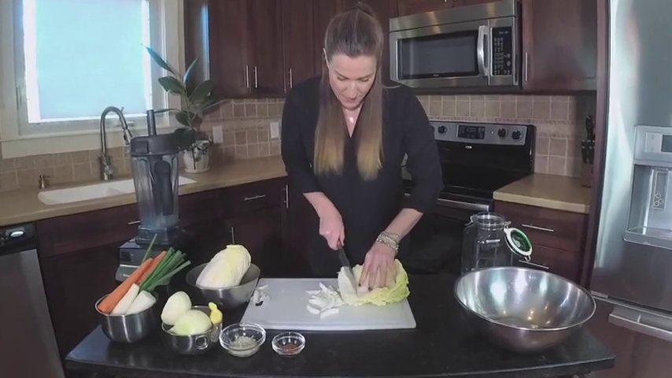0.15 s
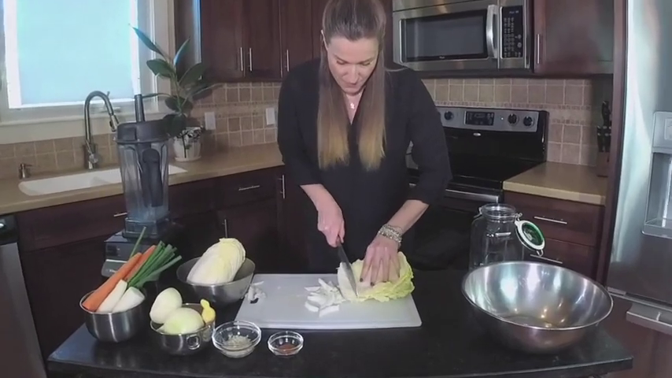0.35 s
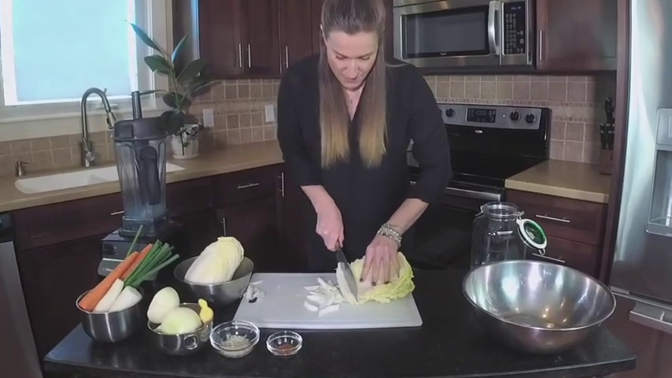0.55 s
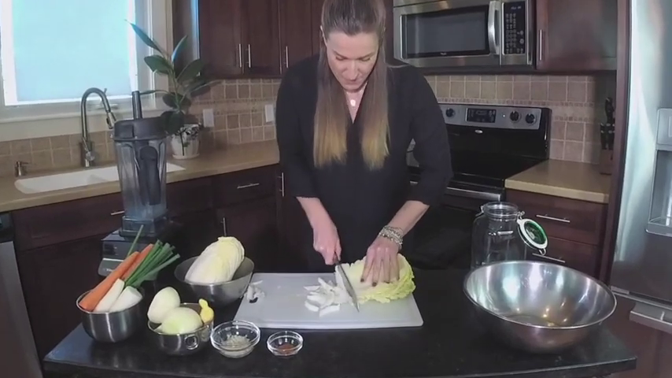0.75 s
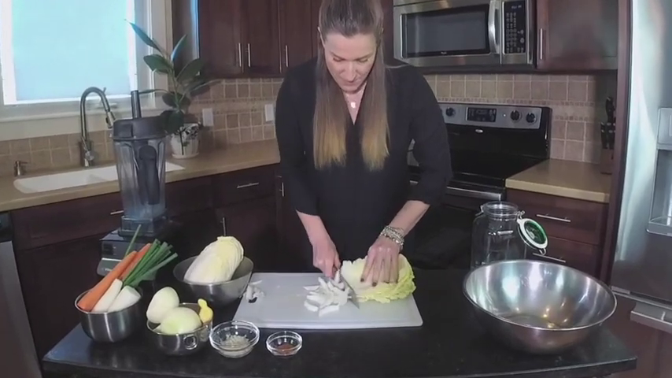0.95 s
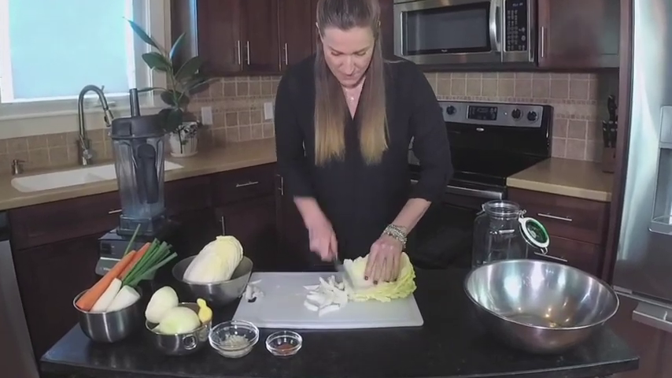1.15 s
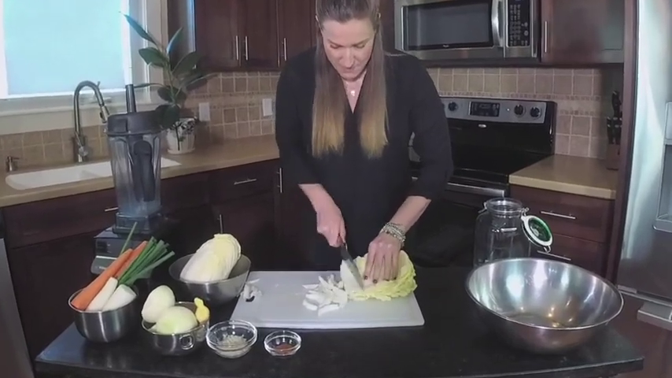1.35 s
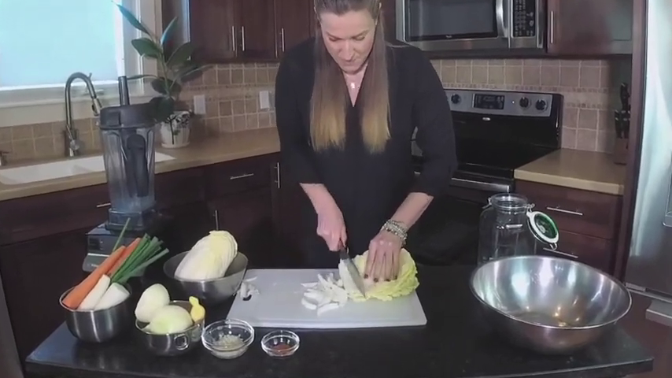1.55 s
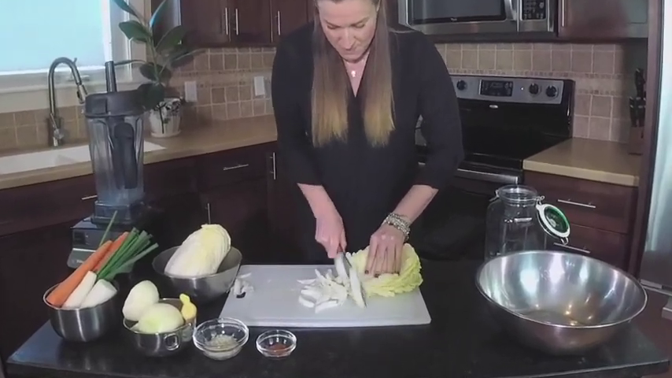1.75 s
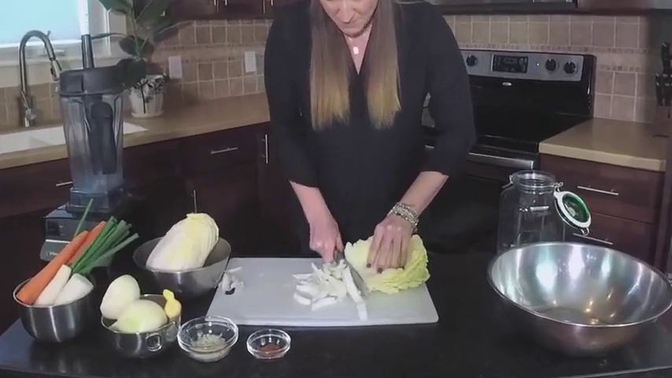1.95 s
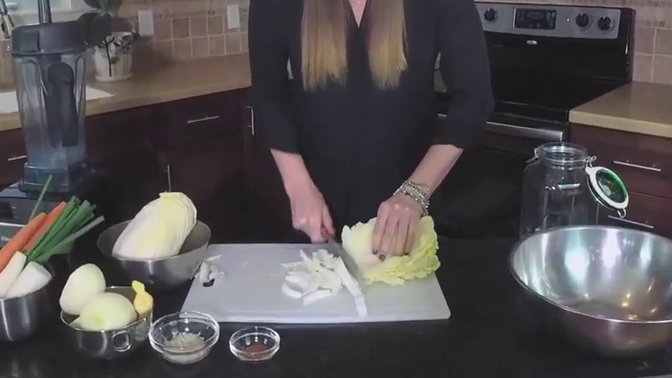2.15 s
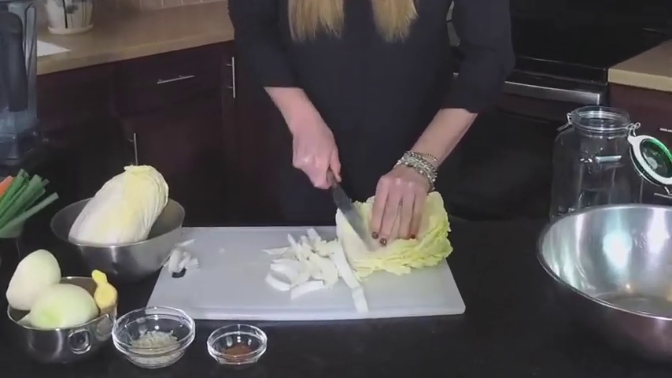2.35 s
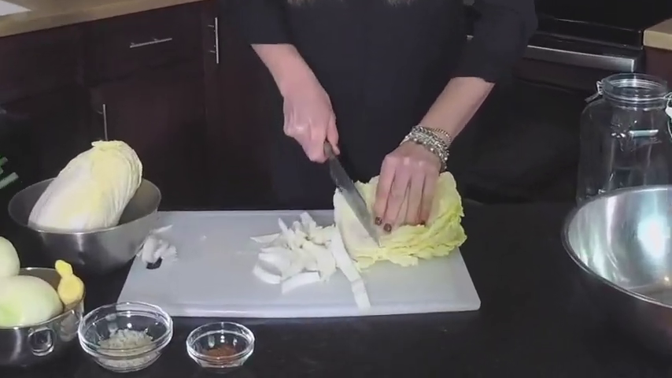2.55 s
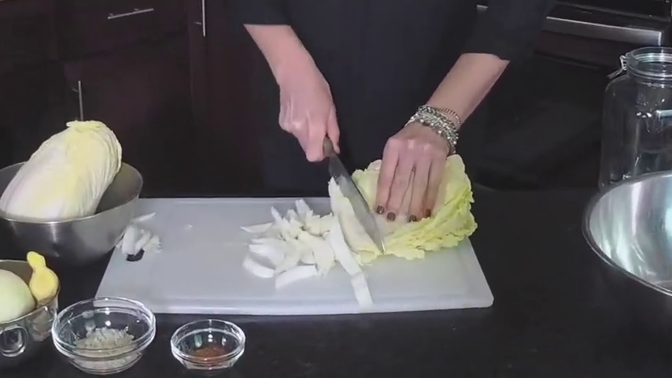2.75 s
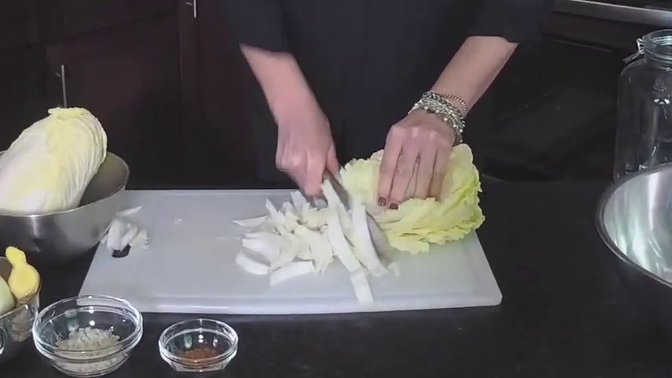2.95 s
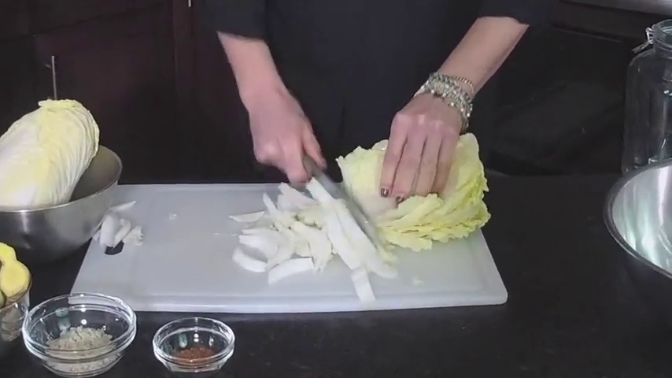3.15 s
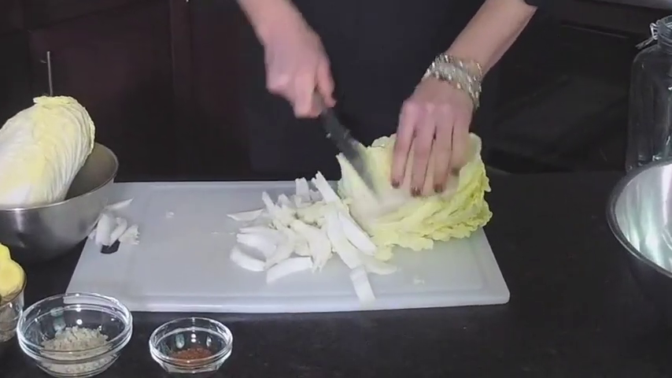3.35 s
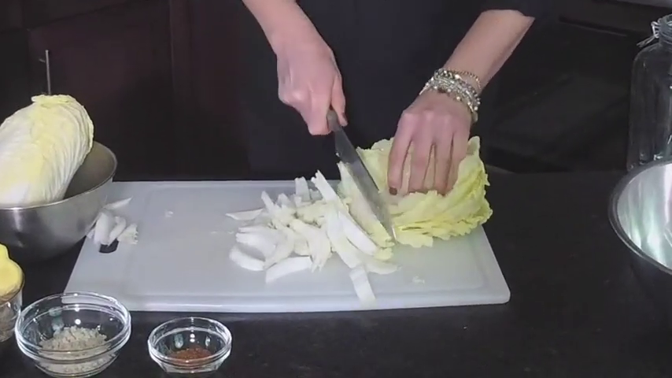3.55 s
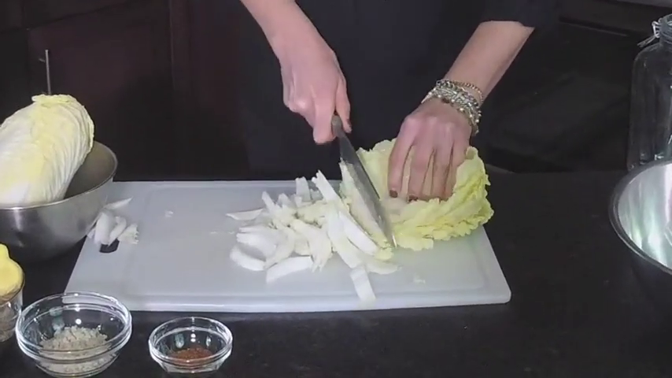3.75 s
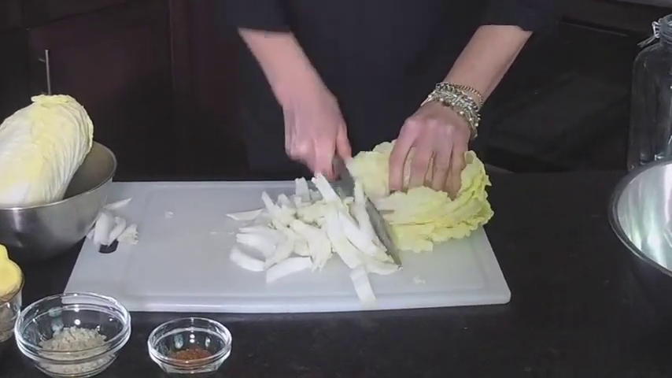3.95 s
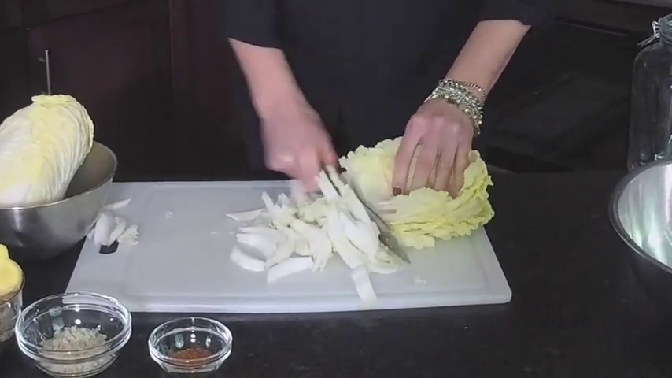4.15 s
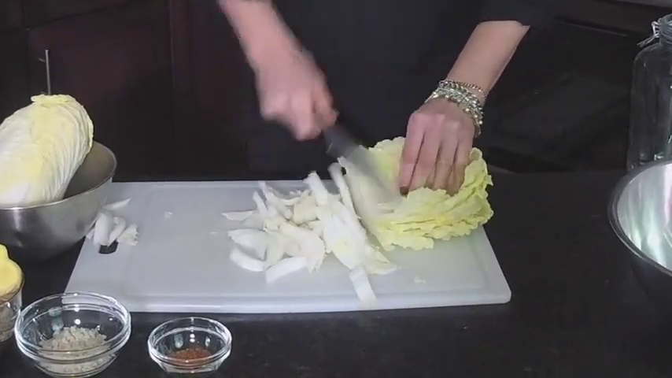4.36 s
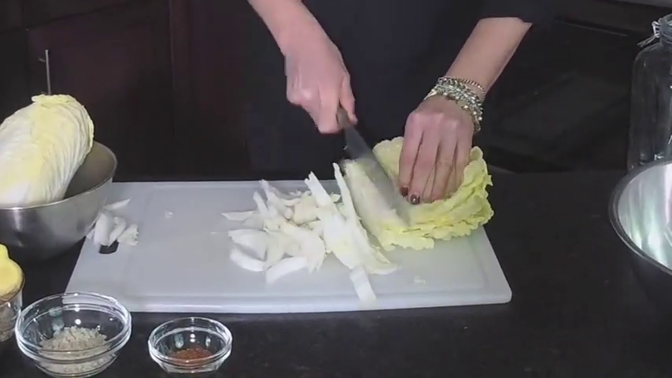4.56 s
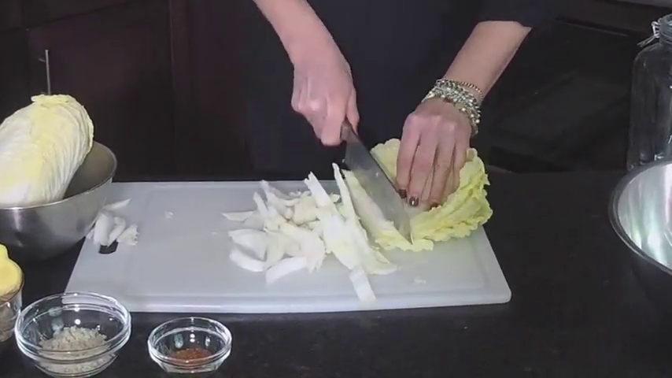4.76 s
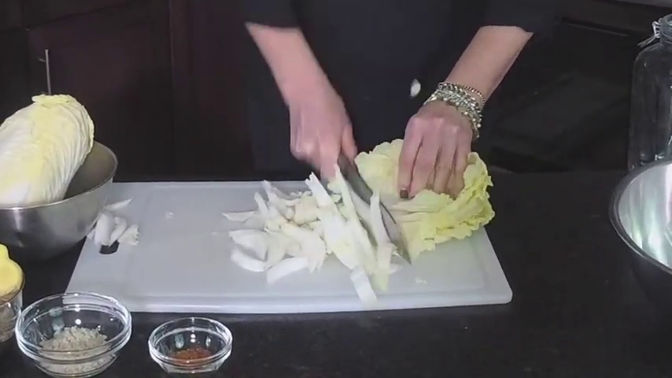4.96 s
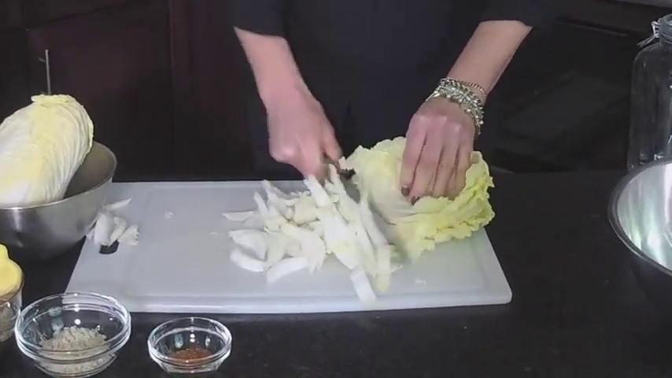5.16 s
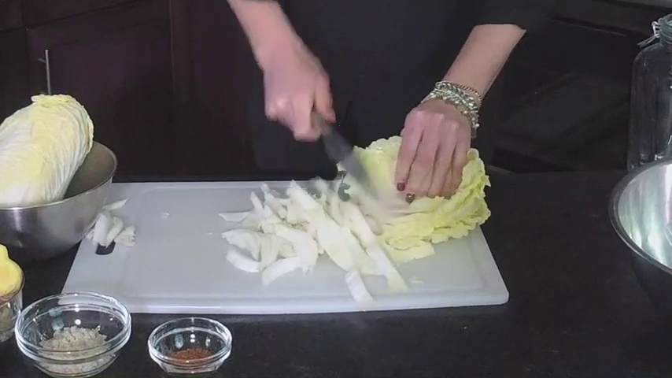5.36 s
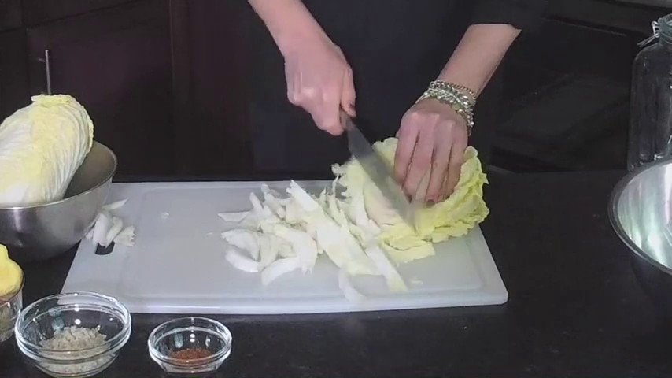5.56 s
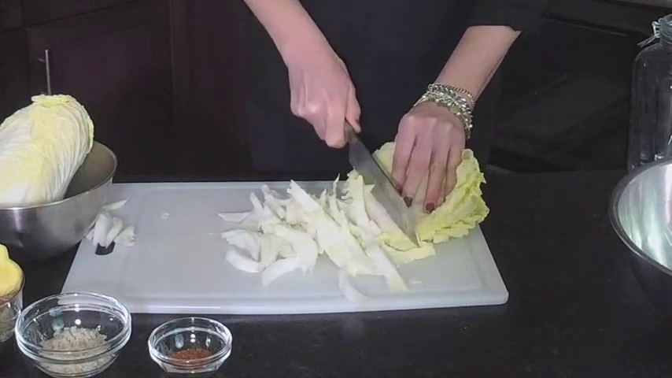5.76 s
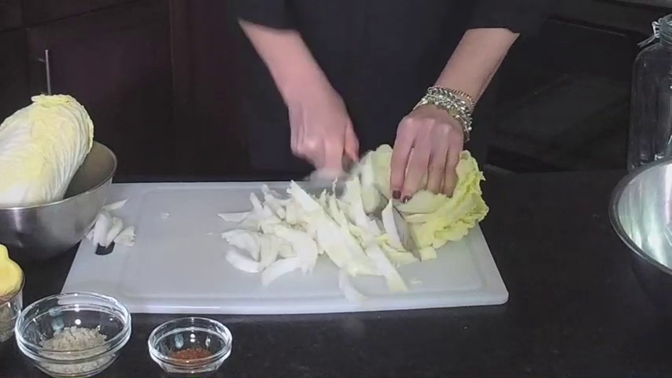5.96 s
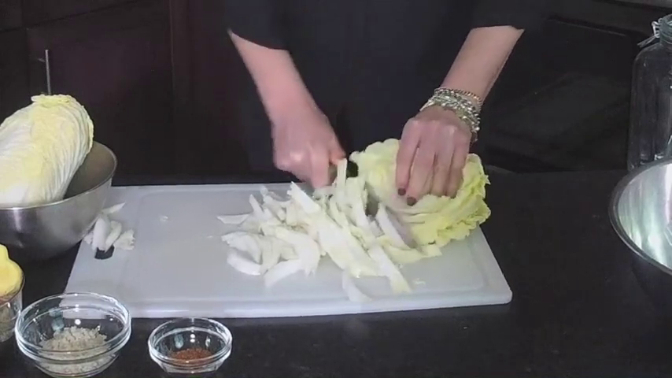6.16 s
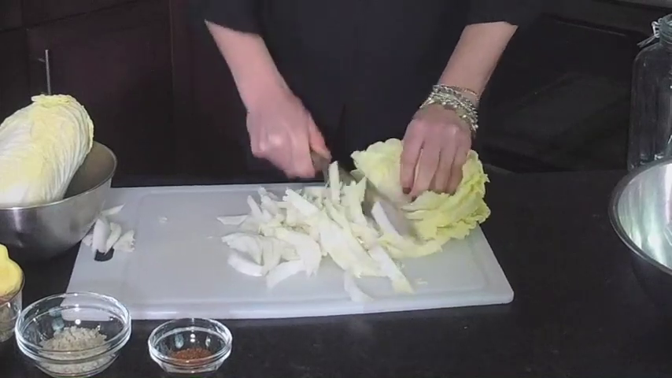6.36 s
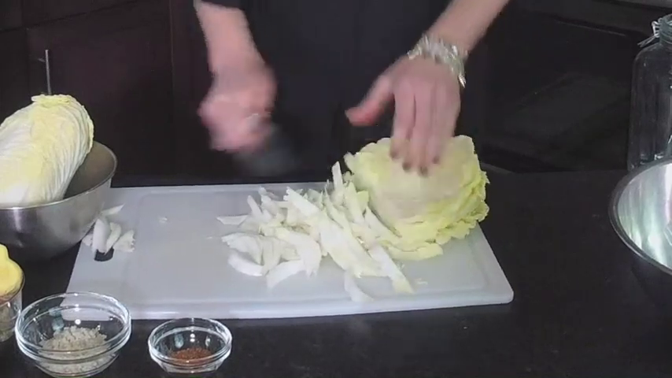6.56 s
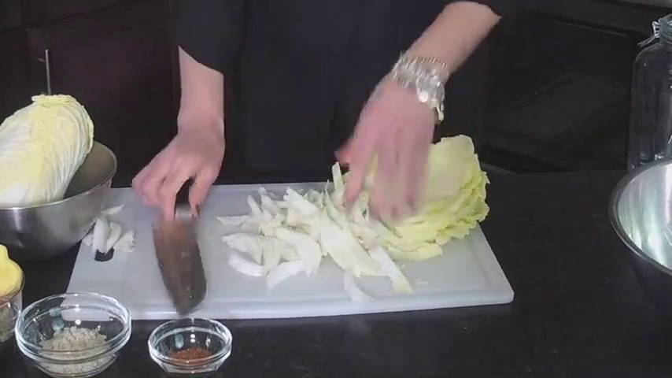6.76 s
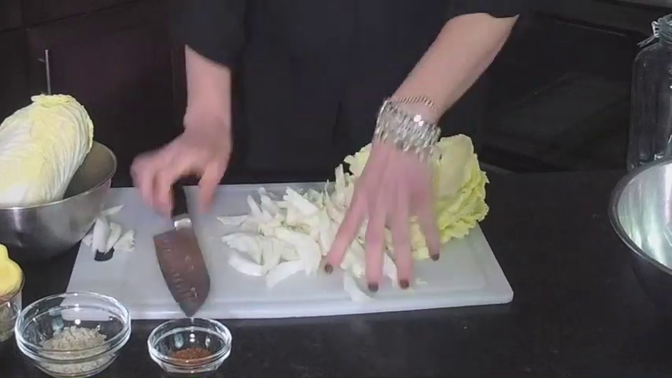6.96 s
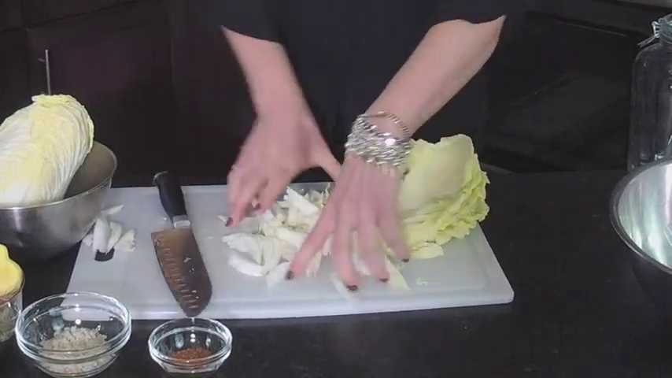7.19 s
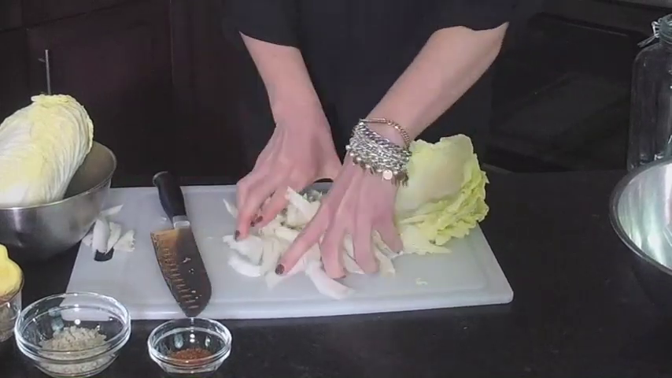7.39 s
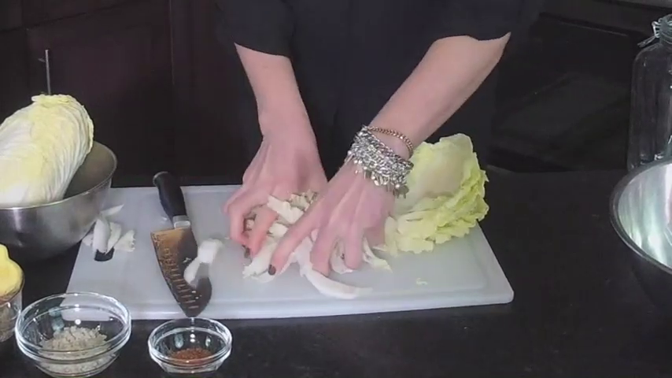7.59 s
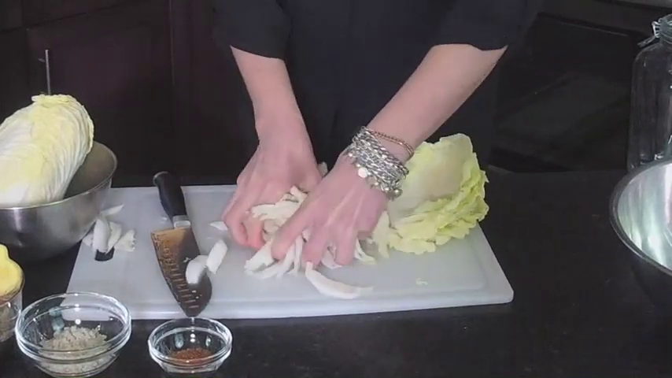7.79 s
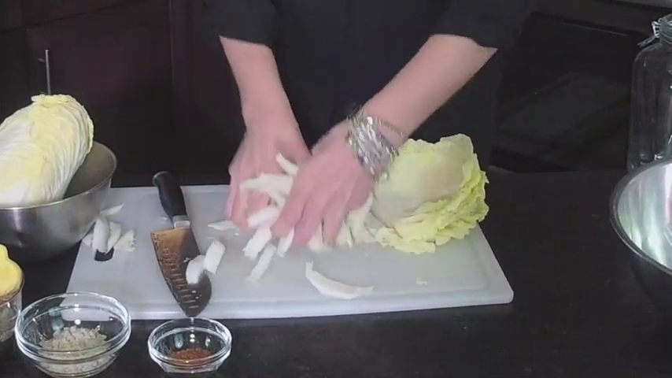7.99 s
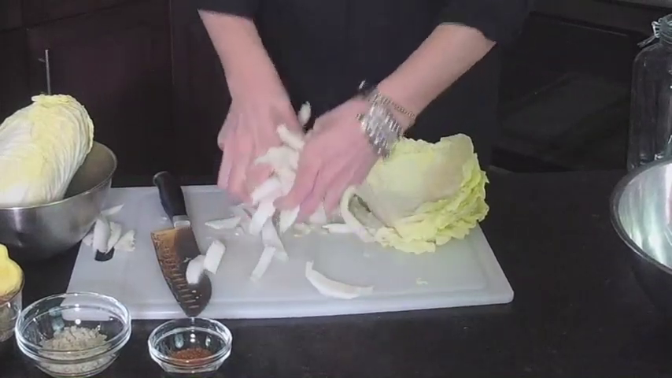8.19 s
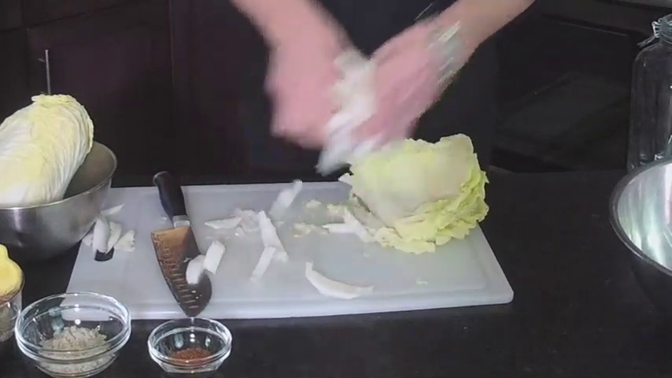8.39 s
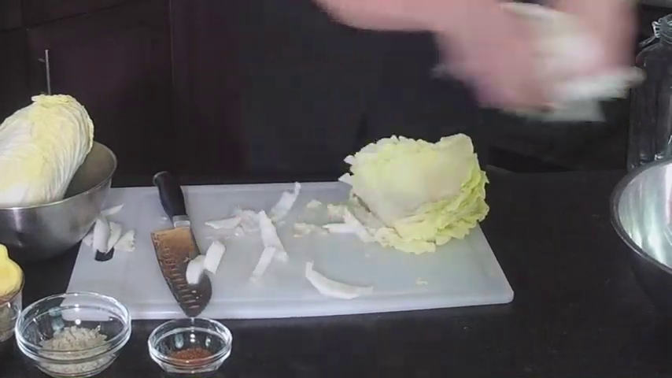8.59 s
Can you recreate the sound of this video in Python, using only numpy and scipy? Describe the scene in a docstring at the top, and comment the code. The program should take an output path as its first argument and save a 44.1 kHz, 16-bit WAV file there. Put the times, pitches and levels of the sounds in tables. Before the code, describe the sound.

Spaced chopping strokes through cabbage: small fibre snaps and hollow stalk pops, a bright tearing crunch, then a woody plastic thwack and a scrape of the blade. The hardest hits overload the close stereo microphone slightly. Short kitchen reverberation follows each. Near seven seconds the knife clatters down lightly, steel ticking against the board, and hands gather shreds with quiet rustles and hollow pops, over a very faint appliance hum.

```python
"""A knife slices cabbage leaves on a plastic board in a hard-walled kitchen. In each stroke the leaf crackles
and tears as grains of noise, fibres snap as resonant noise bursts, and stalks pop as damped sines; the blade
then strikes the board, exciting its modes and the counter below. Later the knife is laid down, its steel
ringing, and hands gather the shreds with crackle, pops and small ticks. Throughout, an appliance hums faintly
as narrow-band noise, the walls reverberate, and a notched microphone clips peaks beyond full scale."""
import sys
import numpy as np
from scipy import signal
from scipy.fft import rfft, irfft, next_fast_len
from scipy.io import wavfile
from scipy.ndimage import uniform_filter1d

SR = 44100
rng = np.random.default_rng(int(sys.argv[2]) if len(sys.argv) > 2 else 0)


def to_wav(s):
    """Save 16-bit WAV."""
    ch = np.atleast_2d(s).T  # columns
    pcm = np.round(np.clip(ch, -1, 1) * 32767)  # PCM
    wavfile.write(sys.argv[1], SR, pcm.astype(np.int16))


N = 380583  # samples

# Blade pressing in, cutting through, and the handling, one list per stretch:
# (time [s], leaf crackle level [dB], board rumble level [dB])
STROKES = [
    [(0.0, -55.5, -56), (0.016, -66, -52), (0.056, -44.5, -50.5), (0.108, -44.5, -51.5),
     (0.156, -71.5, -63), (0.34, -76, -70), (0.394, -65, -66.5), (0.534, -71.5, -73.5),
     (0.54, -62.5, -84.5)],
    [(0.54, -56.5, -79.5), (0.656, -33.5, -46), (0.678, -43.5, -46.5), (0.7, -28.5, -48),
     (0.72, -23.5, -42.5), (0.742, -19, -15), (0.76, -31.5, -21), (0.834, -29.5, -37.5),
     (0.838, -26, -23.5)],
    [(0.838, -23.5, -21), (0.842, -24, -13.5), (0.852, -29.5, -26), (0.888, -22, -32),
     (0.974, -29.5, -30.5), (1.008, -40, -31.5), (1.116, -69.5, -58), (1.342, -78, -71.5),
     (1.388, -65, -60.5)],
    [(1.388, -62, -60), (1.39, -60, -66), (1.47, -48.5, -57.5), (1.476, -39, -51.5), (1.524, -53, -62.5),
     (1.562, -37.5, -47.5), (1.666, -39.5, -56.5), (1.692, -53.5, -57.5), (1.7, -40, -54.5)],
    [(1.7, -35, -59.5), (1.732, -38.5, -54.5), (1.76, -15.5, -27.5), (1.774, -20.5, -9),
     (1.84, -42.5, -26.5), (1.924, -22.5, -26.5), (2.174, -70, -58), (2.434, -72, -68), (2.5, -71.5, -73)],
    [(2.5, -73, -54), (2.504, -63.5, -68), (2.582, -46.5, -60.5), (2.664, -97, -69.5), (2.698, -43, -58.5),
     (2.75, -48, -59), (2.756, -43.5, -51.5), (2.818, -43, -57), (2.866, -36.5, -41.5)],
    [(2.866, -27.5, -38.5), (2.898, -15.5, -28), (2.912, -24.5, -11.5), (2.928, -28, -19),
     (3.05, -26, -27.5), (3.204, -70.5, -51), (3.252, -39, -50), (3.284, -68, -53.5), (3.47, -77, -72)],
    [(3.47, -85.5, -65.5), (3.5, -58.5, -61.5), (3.566, -87, -68.5), (3.588, -44, -57.5),
     (3.664, -56.5, -65.5), (3.81, -41.5, -56), (3.858, -32.5, -35), (3.902, -38.5, -32),
     (3.922, -32.5, -36)],
    [(3.922, -24.5, -37.5), (3.948, -11.5, -7.5), (3.968, -29.5, -17), (4.046, -22, -21.5),
     (4.246, -66, -40.5), (4.28, -46, -37.5), (4.374, -76.5, -56.5), (4.578, -74, -70.5),
     (4.612, -64.5, -75)],
    [(4.612, -57.5, -72), (4.618, -47.5, -60.5), (4.762, -56.5, -69), (4.77, -26.5, -53),
     (4.78, -43, -57.5), (4.826, -31.5, -50.5), (4.84, -32.5, -48), (4.854, -40, -42), (4.89, -25.5, -34)],
    [(4.89, -21, -33.5), (4.902, -20, -23.5), (4.92, -18.5, -24.5), (4.932, -23.5, -18), (4.952, -33, -21),
     (5.03, -33, -32.5), (5.056, -23.5, -27), (5.091, -34, -28)],
    [(5.091, -32.5, -24), (5.093, -30.5, -21.5), (5.193, -60.5, -36), (5.227, -51, -47),
     (5.391, -79.5, -65), (5.439, -64, -57.5), (5.601, -85, -80.5), (5.635, -63.5, -65),
     (5.74, -66.5, -76.5)],
    [(5.74, -59.5, -69), (5.748, -48, -80), (5.766, -36, -58), (5.784, -39.5, -57), (5.79, -34.5, -52.5),
     (5.818, -42.5, -54), (5.824, -40, -44.5), (5.884, -41.5, -62), (5.894, -28.5, -36)],
    [(5.894, -27, -43), (5.898, -23.5, -32.5), (5.93, -17, -25.5), (5.938, -21, -10.5), (5.962, -29.5, -15),
     (6.064, -24, -25), (6.074, -26, -18), (6.162, -44.5, -28), (6.255, -53.5, -36)],
    [(6.255, -54, -37), (6.261, -44, -37), (6.327, -43, -33), (6.365, -65, -38.5), (6.437, -69.5, -56),
     (6.607, -65, -59.5), (6.681, -79, -73), (6.821, -76, -80), (6.868, -71, -71)],
    [(6.868, -60, -58), (6.878, -38.5, -65), (6.89, -31, -36.5), (6.906, -37, -54.5), (6.97, -51, -49.5),
     (6.982, -49, -65.5), (7.02, -62, -52), (7.04, -35, -28)],
    [(7.04, -33, -27.5), (7.05, -14.5, -27), (7.08, -48, -22.5), (7.122, -33.5, -26), (7.126, -24.5, -27),
     (7.156, -38.5, -30), (7.214, -35, -24.5), (7.372, -72.5, -51.5), (7.462, -68, -62.5)],
    [(7.462, -71, -64), (7.47, -54.5, -61), (7.572, -44, -52.5), (7.58, -45.5, -53), (7.746, -59.5, -60.5),
     (7.794, -41.5, -53), (7.864, -39.5, -49.5), (7.928, -74, -62), (7.97, -48.5, -53.5)],
    [(7.97, -52.5, -47), (7.974, -44.5, -65), (8.0, -34.5, -51.5), (8.07, -50.5, -60.5), (8.1, -70.5, -64),
     (8.312, -75, -71), (8.336, -70, -67), (8.356, -79.5, -78), (8.63, -79, -90.5)],
]
# Colour of the leaf's crackle: (frequency [Hz], relative density [dB per Hz])
CRACKLE = [(2000, -39.5), (5000, -14), (7000, -7.5), (8800, -1.5), (9300, -2), (9500, -10.5),
           (10500, -14.5), (11500, -22)]
# Colour of wet tearing: (frequency [Hz], relative density [dB per Hz])
TEARING = [(1000, -34), (2200, -2.5), (3400, -2.5), (4400, 3.5), (6200, 2.5), (7500, -10.5), (10000, -29)]
# Colour of the board under the pushing blade: (frequency [Hz], relative density [dB per Hz])
RUMBLE = [(30, -42.5), (100, -32.5), (200, -6.5), (320, -1), (800, 3), (1400, 2.5), (1750, -4),
          (2000, -14.5), (3000, -39.5)]
# Single fibres snapping: (time [s], peak level [dB], lowest leaf band against that level [dB])
SNAPS = [(0.0515, -23.5, -16), (0.5463, -28, -13), (0.6485, -20, -14), (0.6948, -21.5, -16),
         (0.704, -12.5, -13.5), (0.7232, -6.5, -25), (0.739, -12, -12.5), (0.8412, -15, 12.5),
         (0.8645, -24, -14), (0.7998, -19, -10), (0.9098, -9.5, -7), (0.9647, -12, -6),
         (1.3948, -28.5, -37.5), (1.455, -28, -16.5), (1.479, -21.5, -25), (1.5523, -18, -9.5),
         (1.6012, -24, -8), (1.62, -19.5, -17.5), (1.643, -29, -17.5), (1.6614, -30.5, -14.5),
         (1.701, -22, -20.5), (1.71, -21.5, -19.5), (1.7244, -24, -17.5), (1.7387, -16, -9),
         (1.7557, -3, -7.5), (1.889, -17.5, 0.5), (2.505, -32, -38), (2.5456, -35, -40),
         (2.7022, -19.5, -32), (2.7585, -27.5, -1), (2.805, -21, -13.5), (2.8115, -25, -10),
         (2.837, -22.5, -2.5), (2.8513, -22, -18), (2.8713, -13.5, -10), (3.0025, -13.5, 3.5),
         (3.5869, -42.5, -17.5), (3.6161, -32, -26), (3.7501, -21.5, -4.5), (3.7773, -20, -20.5),
         (3.8134, -21, -8), (3.8454, -23.5, -9), (3.8602, -12.5, -7), (3.8827, -23.5, -0.5),
         (3.908, -22.5, -17), (3.931, -13, 2), (3.9492, 2.5, -6.5), (4.0389, -3, -9.5),
         (4.6265, -27.5, -30.5), (4.718, -30, -40.5), (4.7717, -16, -30), (4.8064, -22.5, -13),
         (4.838, -17.5, 0.5), (4.871, -20, 5), (4.8988, -3, -10), (4.9156, -8, -4.5), (5.0498, -14.5, 0),
         (5.0958, -12, -7), (5.747, -34.5, -21.5), (5.7893, -18.5, -14), (5.894, -11, -6),
         (5.9257, -9.5, -7), (6.0175, -6.5, -17), (6.2654, -32, -9), (6.879, -32, 11), (7.051, -6, -1.5),
         (7.1117, -26, 9), (7.1277, -7, -5), (7.176, -19, -6), (7.187, -25, 4), (7.2067, -17.5, -2),
         (7.5042, -25.5, -11.5), (7.666, -25.5, -60), (7.7964, -20.5, -63), (7.8217, -21.5, -34),
         (7.9755, -26.5, -35)]
# Bands where a snapping leaf rings, highest first: (frequency [Hz], width [Hz])
LEAF_BANDS = [(8400, 2000), (6097, 2100), (3890, 2900)]
# Thick stalks popping with a hollow note: (time [s], level [dB], pitch [Hz])
POPS = [(0.624, -33, 956), (1.551, -32.5, 832), (2.759, -23.5, 902), (3.585, -42.5, 989),
        (3.846, -17, 1205), (3.86, -24, 1110), (3.883, -21, 916), (4.838, -23, 1440), (5.827, -24, 840),
        (7.584, -16, 1042), (7.604, -32, 980), (7.629, -35, 1090), (7.651, -28, 1100), (7.775, -20.5, 1080),
        (7.8, -39, 1000), (7.855, -25, 1060)]
# Blade on the board: (time [s], level [dB], push t60 [s], counter ring against that level [dB],
# counter thump against that level [dB])
BLOWS = [(0.741, -16, 0.008, -2, -22), (0.8416, 0.5, .006, -41, -53.5), (0.996, -24, .02, -12, -22.5),
         (1.772, 0, .02, -16.5, -38.5), (1.994, -17.5, 0.023, -18.5, -28), (2.909, -2, 0.015, -12, -34),
         (3.082, -20.5, 0.025, -16.5, -21), (3.9436, 5.5, .025, -20.5, -34.5),
         (3.949, -3, 0.0077, -27, -40), (4.119, -14, 0.017, -5, -23), (4.903, -12, .02, -23, -29.5),
         (4.927, -6, 0.022, -14.5, -42.5), (5.095, -7, .015, -17, -23), (5.903, -16, 0.017, -15.5, -36),
         (5.938, 4, .02, -19.5, -43.5), (6.071, -6, .02, -14, -32), (6.268, -17, 0.022, -35, -48),
         (6.31, -26.5, 0.013, -34, -40), (6.888, -19, .03, -32, -59), (7.044, -5.5, 0.018, -27.5, -43.5)]
# Modes of the plastic board: (frequency [Hz], width [Hz], level [dB])
BOARD = [(527, 68, 1.5), (860, 180, 4), (1134, 30, 6.5), (1480, 470, 8.5), (1830, 240, 2), (3270, 300, -26),
         (6200, 6300, -13.5)]
# Counter under the board, first its ring, then its thump: (frequency [Hz], t60 [s])
COUNTER = [(310.8, 0.25), (143.5, 0.25)]
# Contacts as the knife is laid down and rocks on the board: (time [s], level [dB])
LAID = [(7.05, -13.5), (7.127, -15), (7.176, -21.5), (7.191, -21.5), (7.21, -22.5), (7.247, -35)]
# Modes of the steel blade: (frequency [Hz], mean level [dB], t60 [s])
STEEL = [(4410, -6, 0.016), (6270, -1, 0.019), (7970, -3.5, .015), (8990, -11.5, .02), (9870, -26, .15)]
# Small pitched ticks among the shreds: (time [s], level [dB], pitch [Hz])
TICKS = [(2.76, -22, 3650), (3.2196, -41, 8980), (3.4835, -35, 3896), (3.5019, -37, 8240),
         (3.5104, -45, 8800), (3.751, -22.5, 8790), (4.6164, -30.5, 8870), (5.22, -30.5, 8490),
         (5.4425, -35.5, 6080), (6.2063, -28, 9230), (6.3225, -24.5, 8470), (7.4669, -31, 5860),
         (8.2062, -40.5, 6050), (8.3255, -41, 6350)]
# Colour of the room's air noise: (frequency [Hz], relative density [dB per Hz])
AIR = [(24, -72.5), (40, -53), (81, -32.5), (107, -7.5), (193, -6.5), (556, -8), (656, -16), (703, -13.5),
       (1000, -20), (3240, -40), (4720, -43.5), (8700, -46.5), (11000, -42.5), (14300, -70), (22000, -120)]
# Wavering motor tones: (frequency [Hz], width [Hz], level [dB])
HUM = [(115, 6.9, -68), (204, 41, -60.5)]
# Reverberation of the kitchen: (frequency [Hz], t60 [s])
KITCHEN = [(150, 0.61), (1000, 0.36), (4000, 0.4), (10000, 0.15)]
# Likeness of left and right: (frequency [Hz], correlation [-1 to 1])
ALIKE = [(60, 0.9), (140, 0.98), (340, 0.99), (800, 0.95), (1900, 0.87), (4500, 0.64), (10700, 0.29)]
# Microphone, left port over right: (frequency [Hz], level difference [dB])
LEFT_OVER_RIGHT = [(7000, 0), (8200, 4), (11000, 8)]
# Microphone notches: (frequency [Hz], width [Hz], depth [dB])
NOTCHES = [(2427, 990, -37.5), (4783, 2790, -36), (7140, 1300, -31)]
# Microphone range: (frequency [Hz], gain [dB])
EDGES = [(20, -32), (90, -5), (200, -4), (10000, 2), (11000, -1), (11800, -16.5)]


def cutting():
    """Granular fracture: crackle and tearing share their grains; the blade's push rumbles in the board."""
    times, *levels = np.concatenate(STROKES).T
    times = np.maximum.accumulate(times)
    crackle_db, rumble_db = [np.interp(np.arange(N) / SR, times, level) for level in levels]
    # tearing follows the rumble by a share of 0.44, the crackle by the rest, 3 dB down
    tearing_db = crackle_db + 0.44 * (rumble_db - crackle_db) - 3
    breaks = grains(rate=180, spread_db=1.5, life=0.0022)
    leaves = hiss(CRACKLE, amp(crackle_db) * breaks) + hiss(TEARING, amp(tearing_db) * breaks)
    push = grains(rate=220, spread_db=-0.5, life=0.015)
    rumble = hiss(RUMBLE, amp(rumble_db) * push)
    return patchy(leaves, depth_db=2.5) + patchy(rumble, depth_db=1.32, size=1024)


def snaps():
    """Impulsive excitation: a snapping fibre rings three leaf bands and also knocks the board's modes."""
    times, db, low_db = np.transpose(SNAPS)
    # the middle band takes only a share of the lowest band's offset
    levels_db = db, db - 1.5 + 0.13 * low_db, db + low_db
    leaf = np.zeros((2, N))
    for level_db, (centre, width) in zip(levels_db, LEAF_BANDS):
        leaf += bursts(times, level_db, 0.016, lambda f: resonance(f, centre, width) ** 3)
    knock = bursts(times, db + low_db - 6.5, 0.022, board)[0]
    return leaf * [[1], [.7]] + knock * [[1], [.4]]


def pops():
    """Free decay: a breaking stalk sounds three damped notes clustered about its pitch."""
    times, db, hz = np.transpose(POPS)[:, :, None]
    return rings(times, hz * [.88, 1, 1.14], db + [-6, 1.5, -5], t60=0.023, attack=0.0043)


def blows():
    """Forced modal vibration: a short rough push of the blade excites the board's modes."""
    times, db, t60 = np.transpose(BLOWS)[:3]
    return bursts(times, db, t60, board)[0]


def board(f):
    """Modal superposition: the causal response of the board's damped modes, alternating in sign."""
    modes = [amp(db) * resonance(f, centre, width) for centre, width, db in BOARD]
    return sum((-1) ** k * mode for k, mode in enumerate(modes))


def counter():
    """Coupled vibration: each blow on the board sets the counter ringing and thumping."""
    times, db, _, ring_db, thump_db = np.transpose(BLOWS)
    (ring_hz, ring_t60), (thump_hz, thump_t60) = COUNTER
    ring = rings(times, ring_hz, db + ring_db, ring_t60, attack=0.0013)
    thump = rings(times, thump_hz, db + thump_db, thump_t60, attack=0.0016)
    return ring + thump


def blade():
    """Modal excitation by contact: each touch of the laid knife rings the steel's modes at new strengths."""
    times, db = np.transpose(LAID)[:, :, None]
    hz, mode_db, t60 = np.transpose(STEEL)
    strength_db = rng.normal(0, 2.3, (len(LAID), len(STEEL)))
    return rings(times, hz, db + mode_db + strength_db, t60, attack=0.00026)


def ticks():
    """Strongly damped oscillation: each tick is two close notes that die at once."""
    times, db, hz = np.transpose(TICKS)[:, :, None]
    return rings(times, hz * [1, 1.07], db + [0, -5], t60=0.009, attack=0.00036)


def room_tone():
    """Stationary noise: soft air noise, with narrow bands of noise that beat like unsteady motor tones."""
    tone = amp(-59) * hiss(AIR)
    for hz, width, db in HUM:
        narrow = filtered(rng.standard_normal(N), lambda f: np.exp(-((f - hz) / width) ** 2))
        tone = tone + amp(db) * unit(narrow)
    return tone


def kitchen(x):
    """Reverberant decay, each frequency at its own rate; the moving cook renews the pattern every 1/4 s."""
    out, step = np.zeros((2, N + 2 * SR)), SR // 4
    delay = 200  # samples before the reverberation begins
    for i in range(0, N, step):
        hz, t, z = signal.stft(rng.standard_normal((2, SR // 2)), SR, nperseg=256)
        decay = amp(-60 * t / along(KITCHEN, hz)[:, None])
        tail = signal.istft(z * decay, SR, nperseg=256)[1]
        wet = signal.fftconvolve(x[:, i:i + step], tail / np.linalg.norm(tail[0]), axes=1)
        out[:, i + delay:i + delay + wet.shape[1]] += wet
    return out[:, :N]


def amp(db):
    """Logarithmic level: the gain of a level in dB."""
    return 10 ** (np.asarray(db) / 20)


def unit(x):
    """Normalisation: x at rms 1."""
    return x / np.sqrt(np.mean(x ** 2) + 1e-20)


def along(points, hz):
    """Interpolation of (frequency, value) points on a logarithmic frequency axis."""
    f, v = np.transpose(points)
    return np.interp(np.log(hz + 1), np.log(f + 1), v)


def filtered(x, response):
    """Linear filtering: the spectrum of x times a complex response of frequency."""
    m = next_fast_len(N + SR // 2)
    return irfft(rfft(x, m) * response(np.fft.rfftfreq(m, 1 / SR)), m)[..., :N]


def resonance(f, centre, width):
    """Damped resonator: unit gain at its centre, width set by the damping."""
    return 1j * f * width / (centre * centre - f * f + 1j * f * width)


def hiss(spectrum, level=1):
    """Coloured noise: two unrelated noises follow a level, then a filter of mean power gain 1."""
    noise = level * rng.standard_normal((2, N))
    return filtered(noise, lambda hz: unit(amp(along(spectrum, hz))))


def grains(rate, spread_db, life):
    """Random-event envelope: rate [1/s] tiny breaks, decaying with time constant life [s], on a steady base."""
    sizes = amp(spread_db * np.minimum(rng.exponential(size=N), 3))
    kicks = (rng.random(N) < rate / SR) * sizes
    return unit(signal.lfilter([1], [1, -np.exp(-1 / (life * SR))], kicks) + 1)


def patchy(x, depth_db, size=256):
    """Random modulation: gain varies in time-frequency patches shared by both channels; no two leaves match."""
    z = signal.stft(x, nperseg=size)[2]
    field = uniform_filter1d(rng.standard_normal(z.shape[1:]), size=5, axis=0)  # across frequency
    field = uniform_filter1d(field, size=10, axis=1)  # across time
    return signal.istft(z * amp(depth_db * unit(field)), nperseg=size)[1][:, :N]


def bursts(times, peaks_db, t60, response):
    """Source and resonator: two unrelated trains of decaying noise; peaks near twice each opening rms."""
    out, t = np.zeros((2, N + SR)), np.arange(SR // 20) / SR
    noise = rng.standard_normal((len(times), 2, len(t)))
    for s, db, life, rough in zip(times, peaks_db, t60 * np.ones(len(times)), noise):
        fade = amp(-60 * t / life)
        burst = fade * rough
        # every burst of one level and t60 carries the same energy
        burst *= np.linalg.norm(fade) / np.linalg.norm(burst, axis=1)[:, None]
        out[:, round(s * SR):][:, :len(t)] += amp(db) / 2 * burst
    # mean power gain 1
    return filtered(out[:, :N], lambda f: response(f) / np.sqrt(np.mean(np.abs(response(f)) ** 2)))


def rings(times, hz, db, t60, attack):
    """Damped harmonic motion: sines starting at the given times, with exponential attack and decay."""
    out, t = np.zeros(N + SR), np.arange(SR // 2) / SR
    for s, f, level_db, life in np.broadcast(times, hz, db, t60):
        envelope = amp(level_db - 60 * t / life) * (1 - np.exp(-t / attack))
        out[round(s * SR):][:len(t)] += envelope * np.sin(2 * np.pi * f * t)
    return out[:N]


def scene():
    """Spatial coherence: two closely spaced ports hear the same bass and ever less alike treble."""
    leaves, cracks, boom = cutting(), snaps(), counter()
    knocks = (blows() + blade()) * np.ones((2, 1))
    cracks = cracks + (pops() + ticks()) * [[1], [.4]]
    wet = kitchen(amp(-12) * leaves + amp(-4) * cracks + amp(2) * knocks + amp(-5) * boom)
    # the first channel becomes the middle, the second the side
    pair = leaves + cracks + (knocks + boom) * [[1], [.4]] + wet + room_tone()
    turn = lambda hz: np.arccos(np.clip(along(ALIKE, hz), -1, 1)) / 2
    mid, side = filtered(pair, lambda hz: np.array([np.cos(turn(hz)), np.sin(turn(hz))]))
    return np.array([mid + side, mid - side])


def record(dry):
    """Transduction: notches, limited range and a brighter left port, then clipping and a band limit."""
    def dip(f, centre, width, db):
        stiffness = centre * centre - f * f
        return (stiffness + 1j * f * width * amp(db)) / (stiffness + 1j * f * width)

    def ports(f):
        notches = np.prod([dip(f, *notch) for notch in NOTCHES], axis=0)
        return notches * amp(along(EDGES, f) + along(LEFT_OVER_RIGHT, f) * [[.5], [-.5]])

    clipped = np.clip(filtered(dry, ports), -1, 1)
    return filtered(clipped, lambda hz: hz < 11800)


dry = scene()
out = record(dry)
to_wav(out)
```